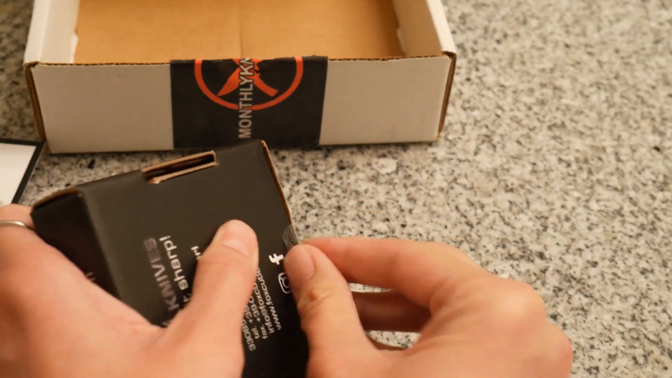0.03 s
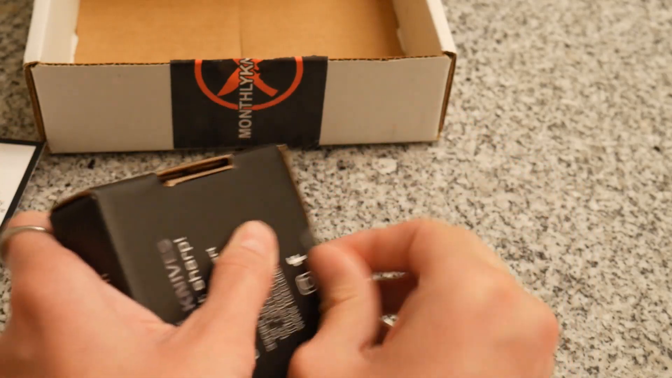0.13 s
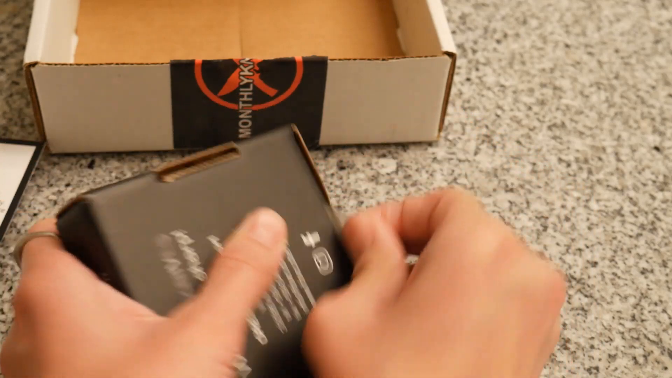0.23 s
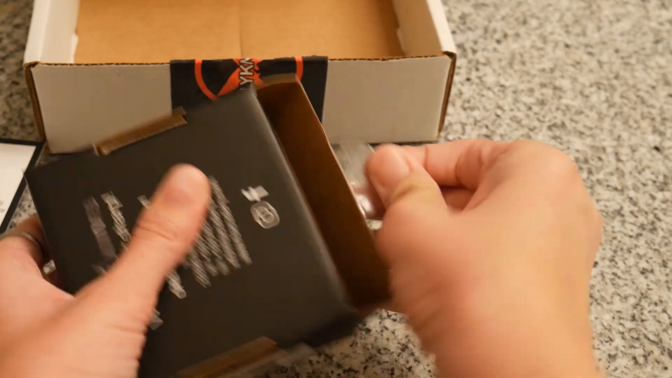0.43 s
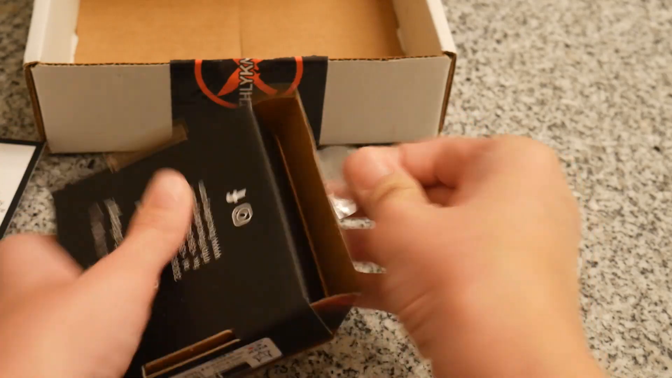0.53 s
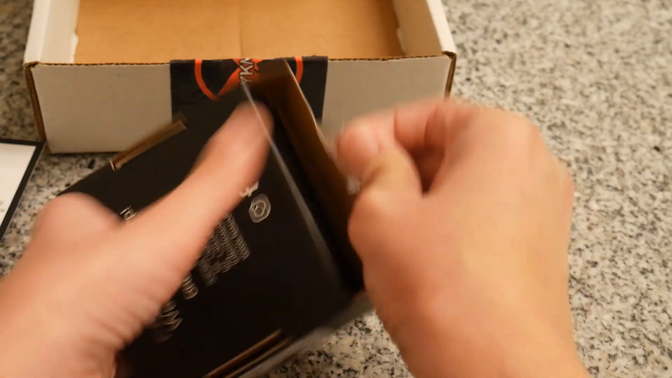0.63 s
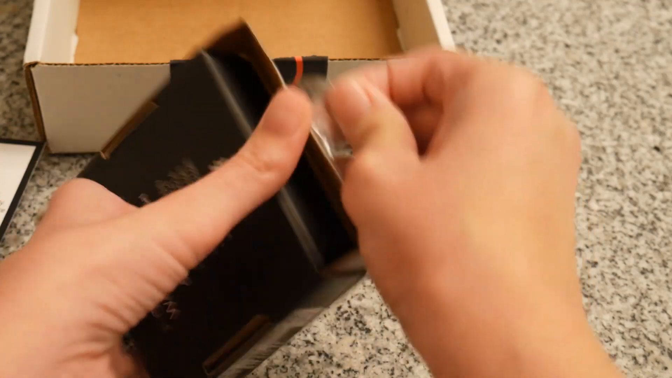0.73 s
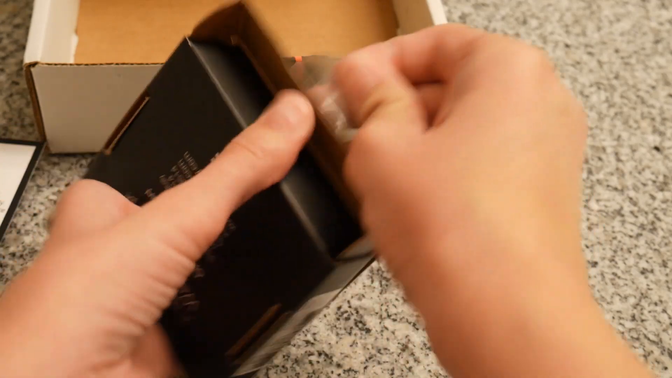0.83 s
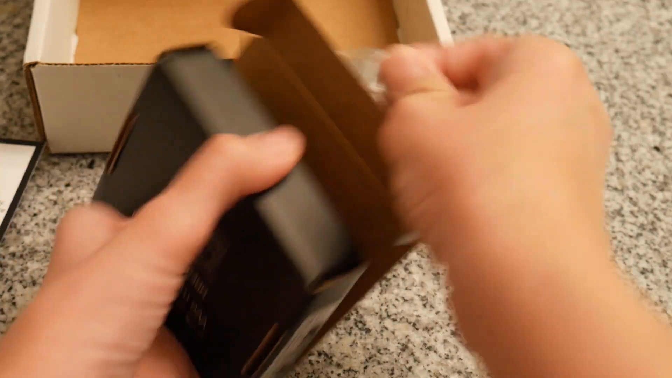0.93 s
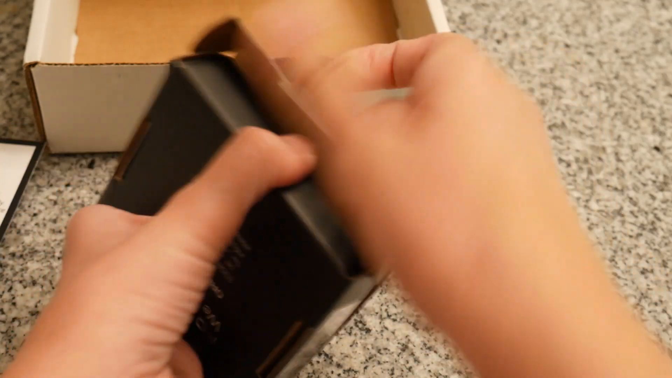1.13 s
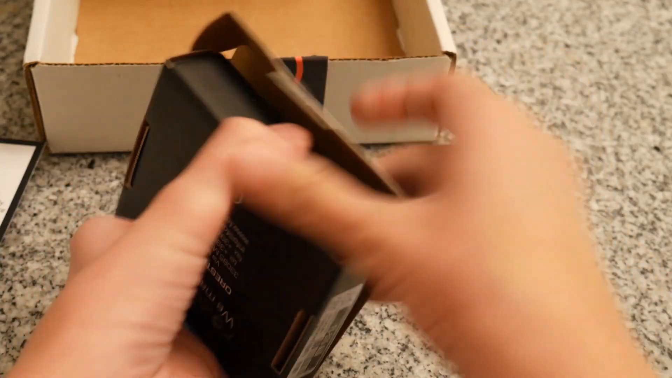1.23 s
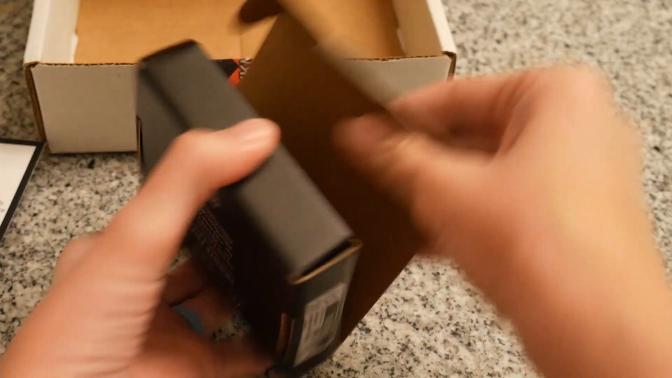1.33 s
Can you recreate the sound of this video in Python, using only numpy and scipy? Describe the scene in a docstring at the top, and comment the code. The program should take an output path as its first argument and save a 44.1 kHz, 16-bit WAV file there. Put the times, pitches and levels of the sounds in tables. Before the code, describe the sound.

A small cardboard box is worked open close by. Faint rubbing leads to a sharp, dry snap at 0.3 seconds. From 0.5 to 0.9 seconds come smaller clicks, grainy scrapes and soft, hollow finger bumps. At about 1 second the lid pops free with a snap and a scrape, then brushes open, fading by 1.5 seconds. A small, hard room adds a brief echo over quiet air and faint hum.

```python
"""A small cardboard box has its tucked lid worked off by hand above a stone counter. Card slides on card with a
grainy rub, the tab sticks and lets go in dry snaps, fingers bump the hollow walls, and the lid finally pops
free and brushes open, ringing in its own modes. A small, hard room answers each sound over a bed of quiet air
and a faint low tone."""
import sys
import numpy as np
from scipy import signal
from scipy.fft import rfft, irfft
from scipy.io import wavfile
from scipy.ndimage import uniform_filter1d, minimum_filter1d

SR = 44100
rng = np.random.default_rng(int(sys.argv[2]) if len(sys.argv) > 2 else 0)


def transcribe(u):
    """Save the signal u as a 16-bit wav file named by the first command-line argument.

    u: samples, shape (n,) or (channels, n), limited to [-1, 1]; the rate is SR.
    q: integer samples, one column per channel.
    """
    v = np.clip(np.atleast_2d(u).T, -1, 1)
    q = np.round(v * 32767).astype(np.int16)
    wavfile.write(sys.argv[1], SR, q)


N = 61740
T = np.arange(N) / SR

# tone of the still air: f/Hz, relative level/dB
AIR_SPECTRUM = [(25, -17), (60, -1.5), (120, 2.5), (250, 3), (500, -0.5), (1000, 1.5), (2000, -1.5),
                (5000, -6), (10000, -14.5), (16000, -17)]
# card slides on card or skin: t/s, length/s, level/dB, f/Hz, width/Hz, relative hiss/dB
SLIDES = [ (.000, 0.048, -53, 1970, 1290, -12.5), (0.074, 0.29, -55.5, 2550, 910, 4.5),
          (.165, 0.067, -53, 934, 168, -10), (0.411, 0.16, -63.5, 4000, 3000, 15),
          (0.531, 0.044, -37, 3500, 810, -1), (0.617, 0.026, -47.5, 1420, 1490, 0),
          (0.692, 0.026, -35.5, 3180, 800, -9), (0.719, 0.032, -37, 1440, 1500, -2),
          (0.739, 0.064, -43.5, 1080, 485, -6), (0.778, 0.037, -40, 2500, 3200, 2.5),
          (0.805, 0.038, -47.5, 2500, 3060, 1.5), (0.822, 0.046, -45.5, 2580, 1980, -3.5),
          (0.917, 0.028, -55.5, 2960, 3000, -0.5), (0.937, 0.096, -61.5, 2050, 2500, 16),
          (1.001, 0.062, -31.5, 4930, 1520, -8.5), (1.023, 0.021, -46, 1000, 910, 10),
          (1.043, 0.044, -33, 2500, 1400, -6), (1.126, 0.12, -49, 2030, 1200, -0.5),
          (1.209, 0.16, -50, 2013, 1520, 6.5), (1.310, 0.24, -61, 1840, 1390, 13), ]
# tone of the paper's surface hiss: f/Hz, relative level/dB
HISS_SPECTRUM = [(100, -14.5), (300, 6), (600, -1.5), (1000, 4), (2500, 1.5), (6000, 4.5), (9000, 2),
                 (12000, -1.5), (16000, -20)]
# early reflections off near surfaces: delay/s, level/dB, scatter/s
ECHOES = [(.0026, -13.5, 0.003), (.0090, -9.5, 0.0029)]
# the room's tail: f/Hz, band level/dB, t60/s, left-right likeness
ROOM_BANDS = [(96, -1, 0.47, 0.31), (300, -0.5, 0.57, 0.86), (600, 4, 0.42, 0.43), (1000, 0.5, 0.52, 0.7),
              (2500, -4.5, 0.36, 0.53), (5000, -4, 0.32, 0.82), (10000, -4.5, 0.24, 0.35),
              (15000, -8.5, 0.21, 0.19)]
# the tab lets go; crack, flap and wall are set against the panel:
# t/s, level/dB, panel f/Hz, panel width/Hz, crack/dB, crack f/Hz, flap/dB, wall/dB, crackle/s, send/dB
SNAPS = [ (0.2345, -46, 4600, 3020, 6, 9500, -12, -5, 0.015, 16),
         (0.2406, -29, 4000, 1300, 6.5, 10000, -5.5, -9.5, 0.0087, -5.5),
         (0.2965, -13.5, 5220, 1880, -2, 10700, -8, -12, 0.0091, 0),
         (.5105, -29.5, 4260, 700, -41, 8050, -13, -23, 0.0049, 6),
         (.5306, -24.5, 3730, 567, 3.5, 10000, -12, -9.5, 0.0048, 0.5),
         (0.6523, -28.5, 5730, 2500, -0.5, 10900, -5, -15, 0.0032, 3),
         (0.677, -29.5, 5470, 2000, -6, 10400, -3.5, -16, 0.0027, -20),
         (0.6845, -20, 6100, 1780, -4, 8200, -6, -11.5, 0.0071, -1),
         (0.953, -47.5, 4450, 3460, -16, 9000, 2.5, -1, .009, 5),
         (0.9878, -15, 4840, 1000, -10.5, 11300, -22, -27.5, 0.0077, -0.5),
         (0.994, -41, 5000, 1110, -13, 10600, -17, -14, 0.0076, 0),
         (1.0346, -30, 4120, 3470, -2, 10000, 0, 2, 0.0037, -5), ]
# faint lasting rings of the box and what it holds: f/Hz, relative level/dB, t60/s
BOX_RINGS = [(960, -40, 0.9), (2192, -26, 0.32), (4160, -32.5, 0.31), (4410, -49, 0.32), (5200, -54, .35),
             (7330, -25, 0.26), (9460, -28, 0.34)]
# fingers bump the hollow box: t/s, level before filtering/dB, f/Hz, t60/s
BUMPS = [ (.2970, -32, 255, 0.046), (0.4919, -29, 334, 0.017), (.5310, -42, 400, 0.014),
         (0.6169, -21, 324, 0.018), (0.646, -33.5, 350, 0.036), (0.724, -26, 377, .03),
         (0.732, -27.5, 258, 0.023), (.7640, -39, 410, .03), (0.797, -39, 300, .03),
         (0.833, -30, 343, 0.033), (0.859, -50, 334, 0.012), (0.956, -39.5, 258, .05),
         (1.0338, -32, 600, 0.029), (1.036, -31.5, 443, 0.034), (1.0380, -35.5, 225, 0.039),
         (1.2740, -37.5, 127.5, 0.071), (1.2800, -43, 266, 0.06), (1.3580, -42.5, 335, 0.045), ]
# brushes across the free lid: t/s, length/s, level/dB
LID_BRUSHES = [(1.035, 0.0063, -22.5), (1.04, 0.028, -32.5), (1.132, 0.096, -45.5), (1.21, 0.066, -45.5)]
# hollow modes of the lid: f/Hz, width/Hz, relative level/dB
LID_MODES = [(1070, 150, -8), (1156, 96, -0.5), (1325, 36, 0), (1433, 49, 1.5), (1505, 70, -5),
             (1790, 91, -7.5), (2050, 180, -3.5), (2746, 71, -4)]


def from_db(db):
    """Decibels to gain."""
    return 10 ** (np.asarray(db) / 20)


def unit_energy(x):
    """Scale to a sum of squares of one."""
    return x / np.sqrt(np.sum(x ** 2) + 1e-20)


def unit_rms(x):
    """Scale to an rms of one."""
    return x / np.sqrt(np.mean(x ** 2) + 1e-20)


def at_hz(table, hz, column=1):
    """Read one column of a table along log frequency."""
    rows = np.array(table)
    return np.interp(np.log(hz), np.log(rows[:, 0]), rows[:, column])


def band(x, low_hz, high_hz, order=2):
    """Causal band-pass."""
    edges = np.clip([low_hz, high_hz], [10, 20], [.44 * SR, .45 * SR])
    return signal.sosfilt(signal.butter(order, edges, "band", fs=SR, output="sos"), x + 1e-18)


def resonance(x, hz, width_hz, order=2):
    """One damped resonance of the card: the wider, the deader."""
    low = np.hypot(hz, width_hz / 2) - width_hz / 2
    return band(x, low, low + width_hz, order=order)


def coloured(x, spectrum):
    """EQ steady noise to a spectrum, at an rms of one."""
    hz = np.maximum(np.fft.rfftfreq(N, 1 / SR), 1)
    return unit_rms(irfft(rfft(x) * from_db(at_hz(spectrum, hz)), N))


def stereo(mid, side, likeness):
    """Left and right from two unrelated noises: likeness 0 is wide, 1 is mono."""
    spread = np.sqrt(1 - likeness) * side * np.array([[1], [-1]])
    return (np.sqrt(1 + likeness) * mid + spread) / np.sqrt(2)


def add(track, start_s, sound):
    """Mix a sound in at a time."""
    i = int(np.clip(start_s * SR, 0, N - 1))
    track[i:i + len(sound)] += sound[:N - i]


def room_tone(air_db=-56.5, hum_db=-73.5, hum_hz=118.6):
    """A wide bed of quiet air with a faint low tone near 120 Hz."""
    air = coloured(stereo(*rng.standard_normal((2, N)), likeness=0.067), AIR_SPECTRUM)
    hum = np.sqrt(2) * np.sin(2 * np.pi * hum_hz * T)
    return from_db(air_db) * air + from_db(hum_db) * hum


def friction(grains_per_s=2700, spread_db=2.5, smooth_db=-1, judder_db=-2, judder_per_s=180):
    """Fibres catch and slip: dense uneven grains over smooth noise, juddering."""
    sizes = from_db(spread_db * np.minimum(rng.exponential(1, N), 5))
    signs = rng.choice([-1, 1], N)
    slips = rng.random(N) < grains_per_s / SR
    grains = unit_rms(sizes * signs * slips)
    judder = np.interp(T * judder_per_s, np.arange(N), rng.standard_normal(N))
    smooth = from_db(smooth_db) * rng.standard_normal(N)
    return unit_rms((grains + smooth) * from_db(judder_db * judder))


def stroke(start_s, length_s, rise_share=0.18, fall_share=0.68):
    """The envelope of one rub: it swells, holds and fades."""
    progress = (T - start_s) / length_s
    return np.clip(np.minimum(progress / rise_share, (1 - progress) / fall_share), 0, 1)


def card_slides():
    """Each stroke's friction takes body from a card panel and hiss from the paper surface."""
    out, rub = np.zeros(N), friction()
    hiss = coloured(friction(), HISS_SPECTRUM)
    for start_s, length_s, db, hz, width_hz, hiss_db in SLIDES:
        body = unit_rms(resonance(rub, hz, width_hz))
        out += from_db(db) * stroke(start_s, length_s) * (body + from_db(hiss_db) * hiss)
    return out


def counter_echoes(x):
    """The counter and near objects throw back short, scattered reflections."""
    response, t = np.zeros((2, N)), T[:SR // 100]
    for delay_s, db, scatter_s in ECHOES:
        burst = stereo(*rng.standard_normal((2, len(t))), likeness=0.27) * np.exp(-t / scatter_s)
        for track, channel in zip(response, burst):
            add(track, delay_s, from_db(db) * unit_energy(channel))
    return signal.fftconvolve(x[None], response, axes=1)[:, :N]


def room_tail(x, predelay_s=0.0019, build_s=0.011):
    """Hard walls return a diffuse tail that dies band by band, the treble first."""
    white, tail = rng.standard_normal((2, 2, N)), 0
    edges_hz = np.geomspace(45, 18000, 15)
    attack = np.clip((T - predelay_s) / build_s, 0, 1)
    for k, (low, high) in enumerate(zip(edges_hz, edges_hz[1:])):
        hz = np.sqrt(low * high)
        envelope = attack * from_db(-60 * T / at_hz(ROOM_BANDS, hz, column=2))
        noise = stereo(*band(white[k % 2], low, high), likeness=at_hz(ROOM_BANDS, hz, column=3))
        tail = tail + from_db(at_hz(ROOM_BANDS, hz)) * unit_energy(envelope) * noise
    return signal.fftconvolve(x[None], tail, axes=1)[:, :N]


def snap(click_db, db, hz, width_hz, crack_db, crack_hz, flap_db, wall_db, crackle_s):
    """One sharp click and a brief crackle drive a panel, a bright crack, the flap and the box wall."""
    t = T[:SR // 20]
    click = from_db(click_db) * (t == 0)
    crackles = rng.standard_normal((4, len(t))) * np.exp(-2 * t / crackle_s)
    on_panel, on_edge, on_flap, on_wall = [unit_energy(crackle) + click for crackle in crackles]
    panel = unit_energy(resonance(on_panel, hz, width_hz, order=1))
    crack = from_db(crack_db) * unit_energy(resonance(on_edge, crack_hz, width_hz=4460))
    flap = from_db(flap_db) * unit_energy(resonance(on_flap, hz=2760, width_hz=1160))
    wall = from_db(wall_db) * unit_energy(resonance(on_wall, hz=1200, width_hz=880))
    gain = from_db(db) * np.sqrt(0.004 * SR)   # the energy of 4 ms at this level
    return gain * band(panel - crack - flap - wall, low_hz=400, high_hz=13300)


def tab_snaps():
    """The tab sticks and lets go, radiating a softer click to the listener, a harder one to the room."""
    direct, send = np.zeros((2, N))
    direct_click_db, send_click_db = -4.5, 3.5   # against the crackle
    for start_s, *shape, send_db in SNAPS:
        add(direct, start_s, snap(direct_click_db, *shape))
        add(send, start_s, snap(send_click_db, *shape) * from_db(send_db))
    return direct, send


def box_rings(snaps, width_hz=45.6):
    """Snaps stir weak, slowly dying modes; each is a narrow noise band, wavering as if the grip shifts."""
    response = np.zeros(N)
    for hz, db, t60 in BOX_RINGS:
        mode = unit_rms(resonance(rng.standard_normal(N), hz, width_hz))
        response += from_db(db - 60 * T / t60) * mode
    return signal.fftconvolve(snaps, response)[:N]


def finger_bumps(attack_s=0.0008):
    """Soft contacts set the walls and the air of the box ringing for a few cycles."""
    out, t = np.zeros(N), T[:SR // 5]
    attack = 1 - np.exp(-t / attack_s)
    for start_s, db, hz, t60 in BUMPS:
        add(out, start_s, attack * from_db(db - 60 * t / t60) * np.sin(2 * np.pi * hz * t))
    return band(out, low_hz=162, high_hz=1200)


def lid_brushes():
    """Once free, the lid answers rubbing with its own hollow modes."""
    pressure = sum(from_db(db) * stroke(start_s, length_s) for start_s, length_s, db in LID_BRUSHES)
    modes = np.zeros(N)
    for hz, width_hz, db in LID_MODES:
        modes += from_db(db) * unit_energy(resonance(pressure * friction(), hz, width_hz, order=1))
    return unit_energy(modes) * np.linalg.norm(pressure)


def scene():
    """The box up close, with early reflections, a send to the room and room tone underneath."""
    snaps, snap_send = tab_snaps()
    bumps = finger_bumps()
    rubs = card_slides() + lid_brushes()
    direct = snaps + bumps + rubs + from_db(-23) * box_rings(snap_send)
    send = snap_send + from_db(-2) * bumps + from_db(-2.5) * rubs
    return direct + counter_echoes(direct) + room_tail(send) + room_tone()


def record(dry):
    """A fast limiter holds any peak over the ceiling; a steep low-pass trims the top."""
    ceiling, limiter_s, cutoff_hz = 0.95, 0.001, 16400
    window = int(limiter_s * SR)
    allowed = ceiling / np.maximum(np.abs(dry).max(axis=0), ceiling)
    gain = uniform_filter1d(minimum_filter1d(allowed, 2 * window), window)
    low_pass = signal.ellip(10, .2, 90, cutoff_hz, fs=SR, output="sos")
    return signal.sosfilt(low_pass, dry * gain)


dry = scene()
out = record(dry)
transcribe(out)
```